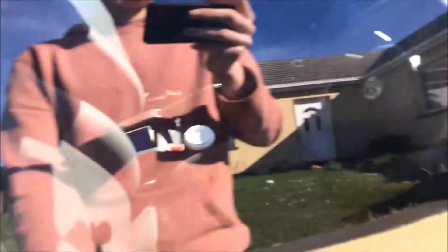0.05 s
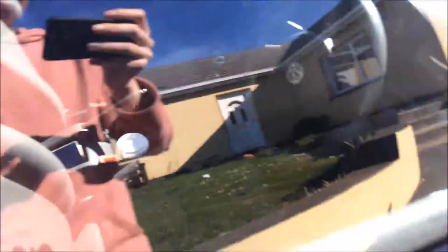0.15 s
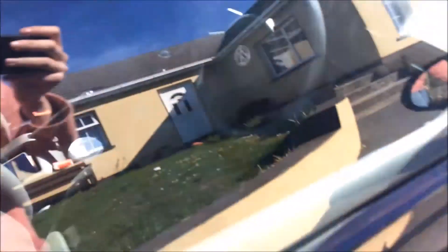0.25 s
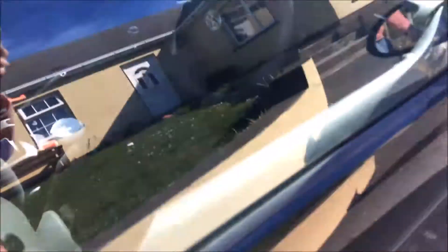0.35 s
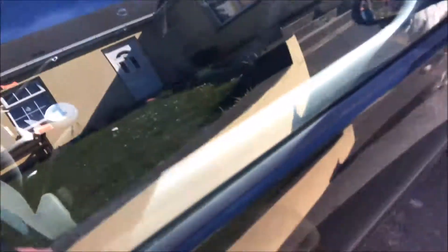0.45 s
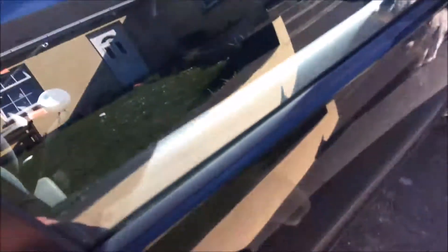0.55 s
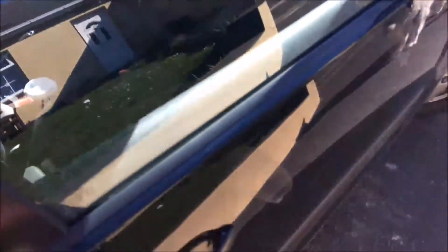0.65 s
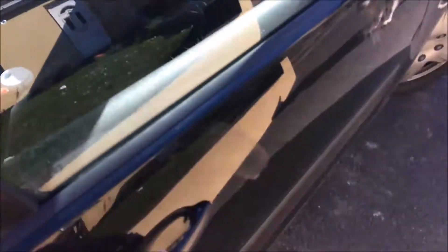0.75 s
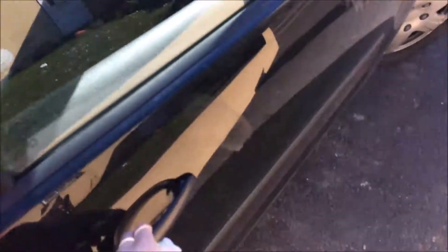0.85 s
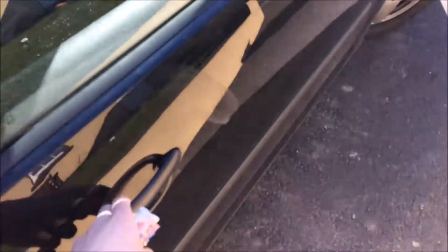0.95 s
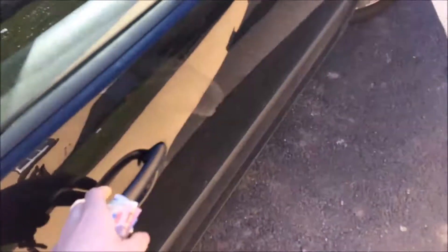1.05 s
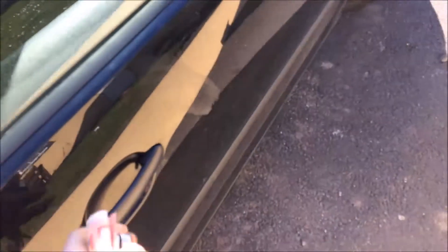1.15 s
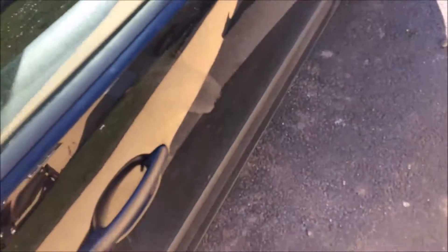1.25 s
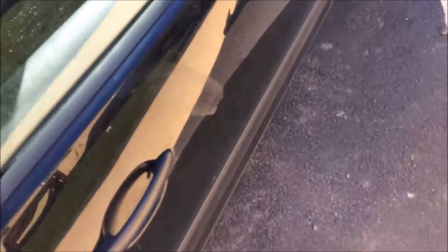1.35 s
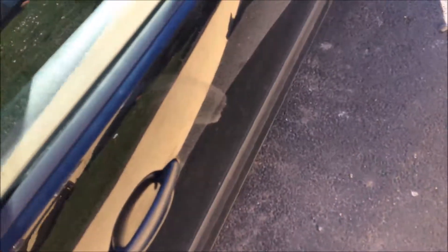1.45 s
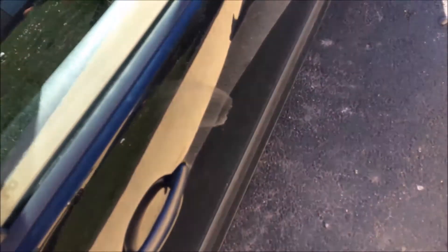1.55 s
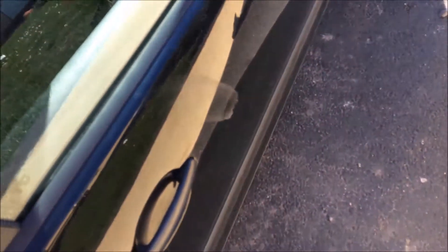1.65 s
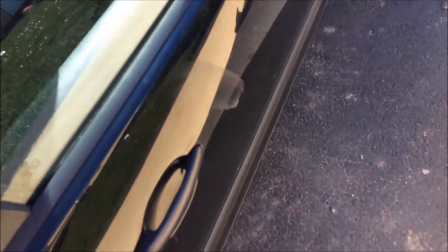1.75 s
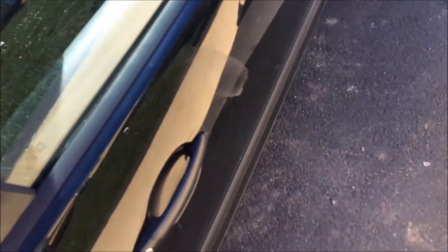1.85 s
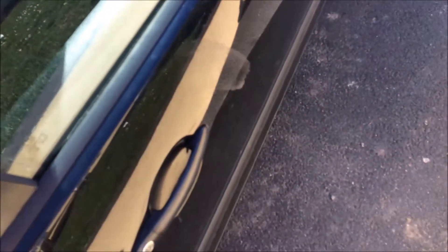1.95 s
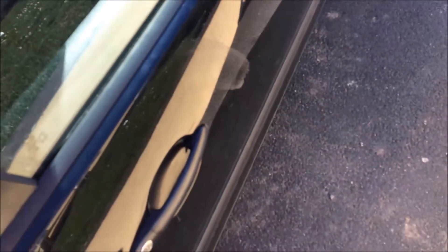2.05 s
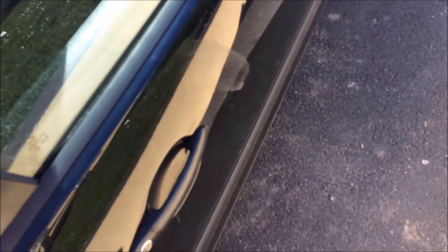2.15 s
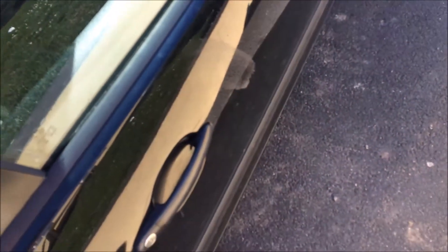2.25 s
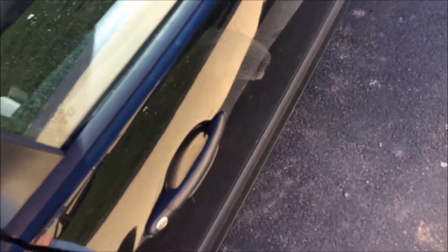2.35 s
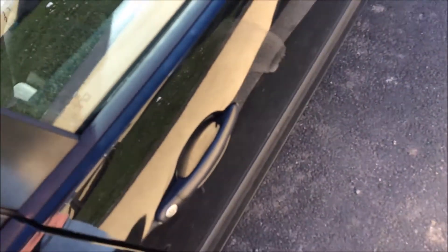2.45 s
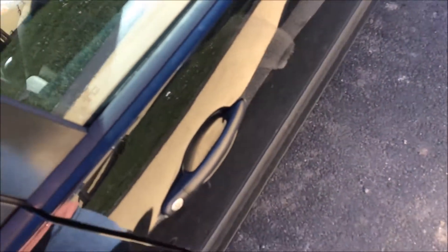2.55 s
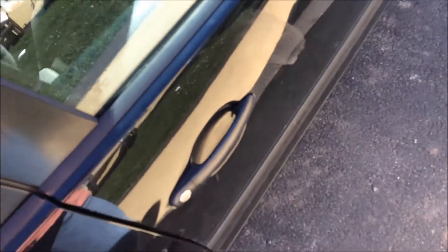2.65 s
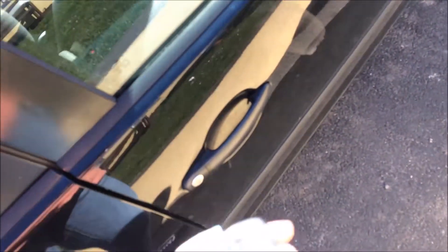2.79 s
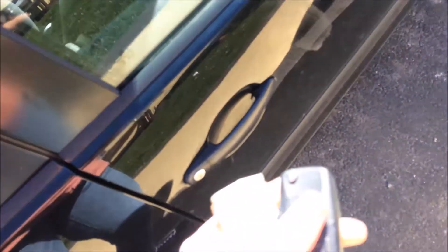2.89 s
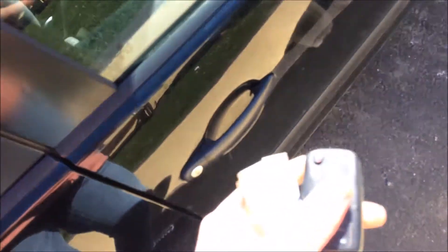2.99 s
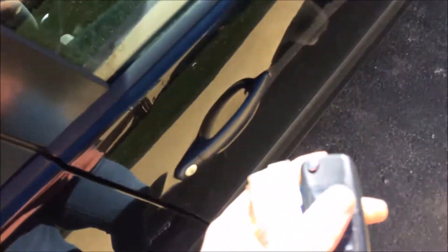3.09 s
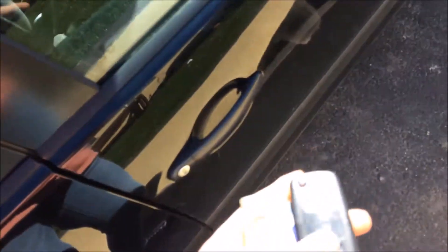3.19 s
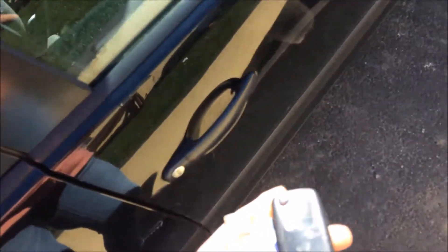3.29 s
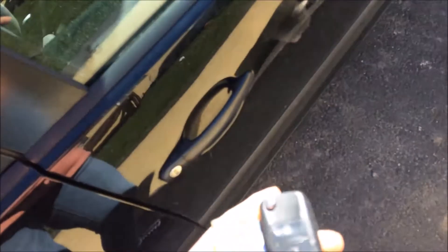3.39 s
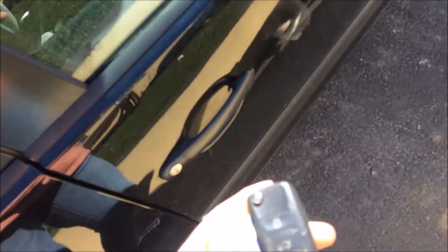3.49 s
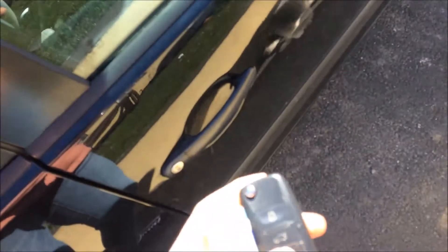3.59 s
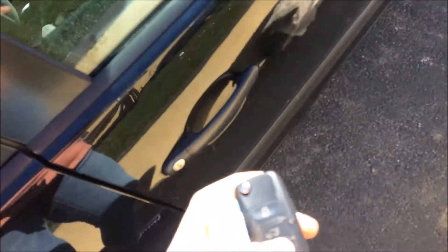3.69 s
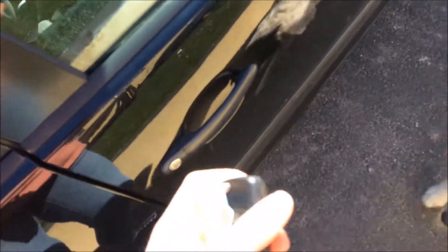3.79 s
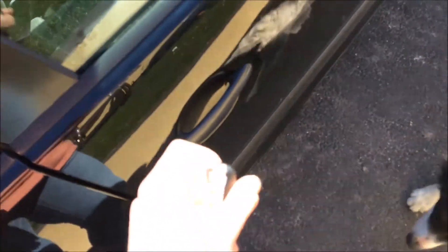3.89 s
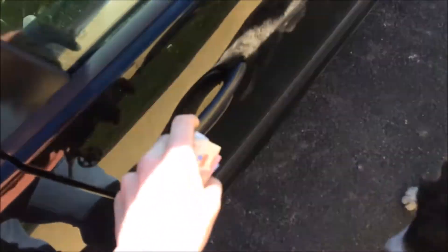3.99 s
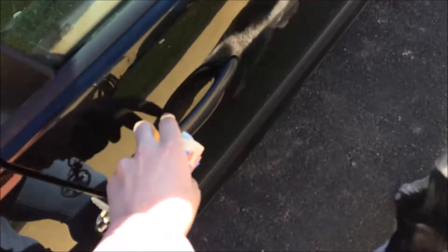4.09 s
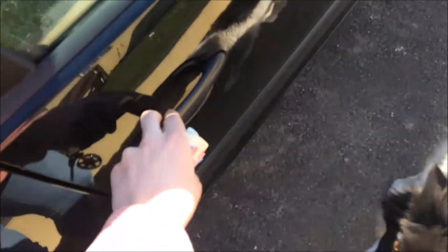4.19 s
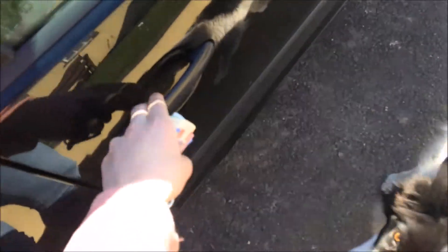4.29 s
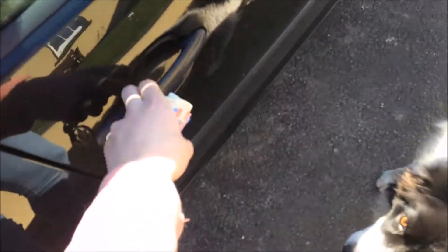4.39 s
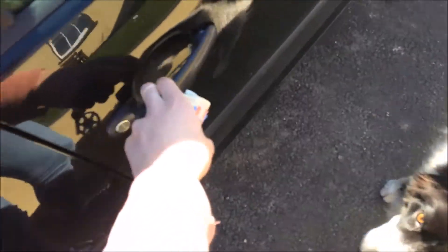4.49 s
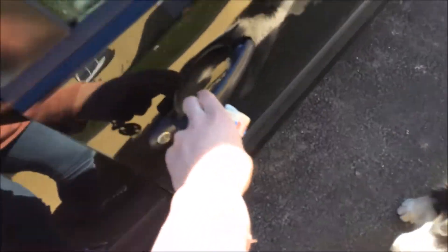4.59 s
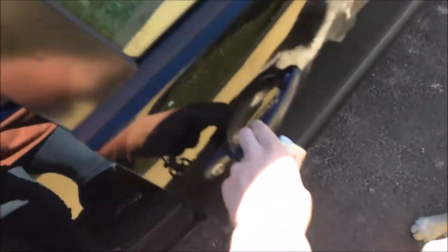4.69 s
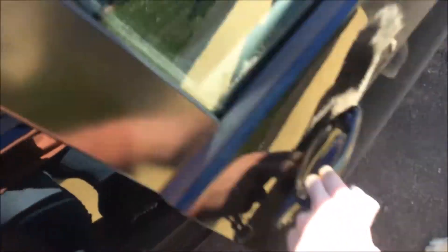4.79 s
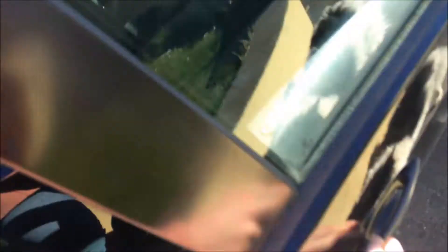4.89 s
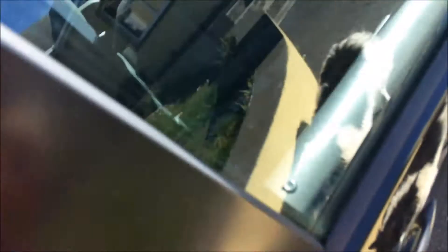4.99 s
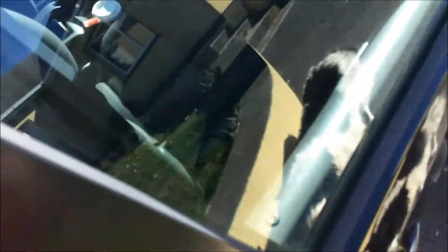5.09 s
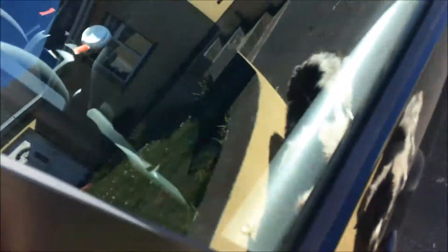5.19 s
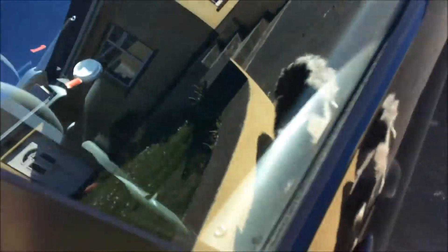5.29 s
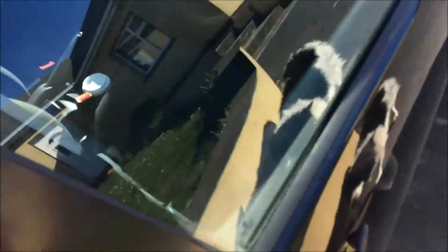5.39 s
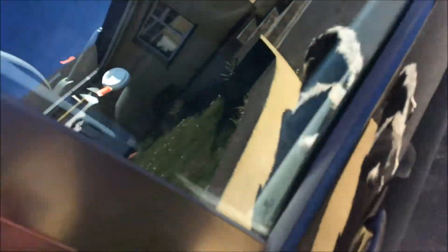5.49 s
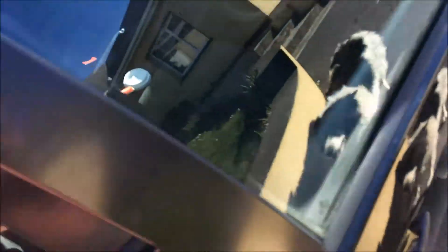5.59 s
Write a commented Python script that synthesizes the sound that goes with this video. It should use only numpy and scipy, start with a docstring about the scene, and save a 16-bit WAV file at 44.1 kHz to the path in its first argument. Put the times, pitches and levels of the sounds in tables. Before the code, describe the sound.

A dry, close mono phone pickup outdoors, about five and a half seconds. At the very start fingers tap dully on the phone, wind bumps low, and a faint bird whistle trembles as it falls. A car door handle snaps sharply at 0.3 s, with a fuller hollow clack at 1.05 s. Keys clink lightly, then jingle brightly from 1.6 to 3.3 s in uneven clusters, with tiny scrapes and thin high ringing, strongest near 2.1 and 3.2 s. A fob button gives small dry plastic snaps at 3.55 and 3.75 s. From 3.9 s the hand rubs and knocks the handle while gusts thump; a solid low clunk lands at 4.55 s. The loudest crack, with panel thud, comes at 5.0 s, and another sharp, lighter snap at 5.3 s. Keys keep jingling to the end over faint steady air.

```python
"""Keys and a car door outdoors

A phone is held in one hand while the other tries a door handle, fumbles with keys and presses a fob;
the locks clunk and the door unlatches. Keys, fob and door are decaying tones with short noise bursts,
dragging and rubbing are tiny noisy contacts, wind is low noise with slow swings as gusts bump the
microphone, and a bird gives one trembling whistle over faint air noise.
"""
import sys
import numpy as np
from scipy import signal
from scipy.fft import rfft, irfft
from scipy.io import wavfile
from scipy.ndimage import uniform_filter1d

SR = 44100
rng = np.random.default_rng(int(sys.argv[2]) if len(sys.argv) > 2 else 0)


def inscribe(sig):
    """Save sig as 16-bit PCM at rate SR to the path in sys.argv[1].

    A 1-D sig is mono; a 2-D sig holds one channel per row.
    Samples are clipped to [-1, 1] before scaling.
    """
    pcm = np.round(np.clip(np.atleast_2d(sig).T, -1, 1) * 32767)
    wavfile.write(sys.argv[1], SR, pcm.astype(np.int16))


N = 248724

# Tones of the four pieces of the bunch, a to d; in each: f/Hz, relative level/dB, free t60/s
KEY_MODES = [
    [(11030, 0, .2), (11065, -9, .12), (9700, -25, .15), (11200, -16, .08)],
    [(12755, 0, .16), (12790, -4, .14), (13900, -9, .05), (12400, -16, .06)],
    [(7890, 0, .17), (7950, -6, .1), (2400, -16, .1)],
    [(6505, 0, .16), (7100, -3, .09), (10600, -9, .06), (5930, -12, .08)],
]
# The moving hand: t/s, key rattle level/dB, level of rubbing on the door/dB
HAND_MOTION = [(0.0, -64, -57), (0.45, -72.5, -72.5), (0.66, -57.5, -54), (0.8, -73, -73.5),
               (1.0, -76.5, -63.5), (1.12, -63, -53), (1.22, -67.5, -84), (1.56, -61, -81),
               (1.8, -62.5, -88), (2.14, -63.5, -82), (2.23, -72.5, -61), (2.32, -72.5, -95),
               (2.62, -63, -78), (2.82, -74.5, -83), (3.0, -62.5, -66.5), (3.13, -68.5, -82),
               (3.24, -59.5, -74.5), (3.5, -71, -70.5), (3.82, -66, -74), (3.91, -50, -39.5),
               (4.05, -73, -43.5), (4.17, -72, -74), (4.42, -64, -67.5), (4.62, -55, -36),
               (4.74, -70.5, -92), (5.0, -70, -44.5), (5.2, -66, -73), (5.4, -54.5, -62),
               (5.64, -58.5, -79)]


def undb(db):
    """Turn decibels into a plain factor."""
    return 10 ** (np.asarray(db) / 20)


def unit(x):
    """Scale to rms 1."""
    return x / np.sqrt(np.mean(x ** 2))


def band(x, lo_hz, hi_hz):
    """Keep the band between two frequencies (Butterworth filter)."""
    sos = signal.butter(2, [lo_hz, min(hi_hz, .45 * SR)], "bandpass", fs=SR, output="sos")
    return signal.sosfilt(sos, x)


def curves(table):
    """Join the points of each table column by straight lines, one value a sample."""
    s, *columns = np.transpose(table)
    return [np.interp(np.arange(N) / SR, s, c) for c in columns]


def add(out, s, x):
    """Mix x into out from time s."""
    i = int(s * SR)
    out[i:i + len(x)] += x[:N - i]


def fade(t, t60):
    """Exponential decay that falls 60 dB in t60 seconds."""
    return np.exp(-np.log(1000) * t / max(t60, 1e-3))


def ring(modes, t, share, scatter_db, detune, near_hz=None, focus_db=0):
    """One blow sounds a set of decaying tones; share scales their ring time, near_hz favours a pitch."""
    hz, db, t60 = np.transpose(modes)[:, :, None]
    gain, bend, phase = rng.standard_normal((3, len(modes), 1))
    if near_hz:
        # focus_db is lost for each octave away from the favoured pitch
        db = db - focus_db * np.abs(np.log2(hz / near_hz))
    swing = np.sin(2 * np.pi * hz * (1 + detune * bend) * t + phase / 2)
    decay = np.exp(-np.log(1000) * t / (t60 * max(share, .05)))
    return np.sum(undb(db + scatter_db * gain) * swing * decay, axis=0)


def burst(t, lo_hz, hi_hz, t60):
    """A decaying puff of noise."""
    return unit(band(rng.standard_normal(len(t)), lo_hz, hi_hz)) * fade(t, t60)


def grains(rate, spread_db, t60, size=N):
    """Noise broken into tiny uneven contacts, on average rate of them a second."""
    strength = undb(spread_db * np.minimum(rng.exponential(size=size), 3.2))
    hits = (rng.random(size) < rate / SR) * strength + 1e-9
    tail = signal.lfilter([1], [1, -fade(1 / SR, t60)], hits)
    return unit(tail * rng.standard_normal(size))


def colour(x, spectrum):
    """Shape by (f/Hz, level/dB) points, falling 24 dB per octave outside them."""
    hz, db = np.transpose(spectrum)
    f = np.fft.rfftfreq(N, 1 / SR) + 1
    octaves_outside = np.maximum(np.log2(hz[0] / f), 0) + np.maximum(np.log2(f / hz[-1]), 0)
    gain_db = np.interp(np.log(f), np.log(hz), db) - 24 * octaves_outside
    return unit(irfft(rfft(x) * undb(gain_db), N))


def keys():
    """Each clink is a click plus the ring of the pieces it touches; the moving bunch also rattles finely."""
    # Keys striking each other: t/s, relative bright click level/dB, relative dull click level/dB,
    # dull pitch f/Hz, base t60 of the click, its bright and dull noise and its dull tones/s,
    # relative ring level/dB, pieces struck directly
    clinks = [(0.0817, -46, -64, 3000, 0.015, -53.5, "a"), (0.1, -38.5, -73, 2920, 0.03, -49.5, "b"),
              (0.228, -54, -63, 1370, 0.03, -64, "d"), (0.342, -56, -58, 3400, 0.076, -68, "bc"),
              (0.3637, -42, -49, 2070, 0.046, -53.5, "bc"), (0.4058, -47, -53, 1343, 0.14, -53.5, "bcd"),
              (0.4404, -41, -45, 1700, 0.057, -50.5, "ac"), (0.452, -34, -62, 1740, 0.063, -54, "c"),
              (0.551, -42, -51.5, 4400, 0.023, -52, "b"), (0.5968, -53, -52, 2360, 0.03, -42, "c"),
              (0.6533, -28.5, -43.5, 1577, 0.1, -48, "c"), (0.946, -63, -51.5, 1280, 0.013, -86, "a"),
              (0.9793, -42, -52, 1430, 0.012, -71, "a"), (1.1005, -54, -64, 1400, 0.024, -48, "b"),
              (1.2213, -37, -55.5, 2410, 0.13, -50, "bcd"), (1.358, -57, -56, 3200, 0.025, -65, "abc"),
              (1.588, -33, -52, 1410, 0.022, -73, "bc"), (1.6152, -34, -67, 5800, 0.051, -48.5, "abc"),
              (1.688, -54, -50, 3730, 0.024, -71, "ac"), (1.7003, -52, -54, 2400, 0.077, -52, "ab"),
              (1.7215, -47, -66, 5300, 0.057, -51, "abc"), (1.8853, -38, -53, 1910, 0.043, -58, "bc"),
              (1.93, -21.5, -47, 2040, 0.02, -68, "bd"), (1.964, -16.5, -45, 1970, 0.029, -52, "abd"),
              (2.0208, -43, -41.5, 1930, 0.0074, -63, "ac"), (2.0672, -50, -49, 2190, 0.042, -53, "a"),
              (2.0854, -18.5, -42, 1750, 0.02, -50, "ad"), (2.12, -34, -48.5, 3670, 0.067, -44.5, "a"),
              (2.1602, -24, -38.5, 5140, 0.047, -34.5, "b"), (2.4124, -36, -78, 1680, 0.013, -64, "a"),
              (2.453, -25, -38, 4700, 0.0055, -49, "a"), (2.495, -49, -49, 1860, 0.021, -79, "c"),
              (2.5193, -49, -39.5, 2050, 0.023, -59, "ad"), (2.5681, -42, -48, 3730, 0.0075, -54.5, "b"),
              (2.593, -32, -42, 3850, 0.018, -68, "b"), (2.6055, -38, -46.5, 3780, 0.1, -39.5, "b"),
              (2.7511, -37.5, -54, 2340, 0.073, -47, "c"), (2.7726, -37, -52, 2300, 0.03, -51, "bd"),
              (2.802, -53, -45.5, 2440, 0.017, -53, "c"), (2.9128, -30, -54, 1814, 0.27, -40.5, "bc"),
              (2.9398, -21, -31, 3740, 0.015, -48, "c"), (2.962, -24, -55, 4900, 0.074, -46, "bc"),
              (2.9816, -17, -48, 5070, 0.043, -33.5, "bc"), (3.0565, -47, -54, 5730, 0.021, -63, "ab"),
              (3.0714, -21.5, -71, 5300, 0.038, -43.5, "a"), (3.1815, -27, -55, 5330, 0.071, -46, "ab"),
              (3.2023, -22.5, -51.5, 4840, 0.13, -24.5, "a"), (3.324, -37, -55, 4760, 0.05, -61, "b"),
              (3.4318, -35, -81, 4860, 0.03, -55.5, "bcd"), (3.7138, -31, -48, 5830, 0.034, -82, "bd"),
              (3.8387, -46, -52, 1890, 0.19, -48, "b"), (3.8677, -24, -37, 2340, 0.02, -45, "bc"),
              (3.958, -48, -39.5, 2100, 0.09, -47.5, "a"), (4.0666, -40, -42, 2304, 0.063, -38, "ab"),
              (4.093, -27, -46, 2300, 0.03, -50, "ab"), (4.1895, -25, -37, 1180, 0.027, -62, "bd"),
              (4.219, -48, -35.5, 1770, 0.0097, -62, "cd"), (4.238, -35, -50, 2500, 0.049, -58, "c"),
              (4.2657, -27, -49, 3050, 0.029, -51, "a"), (4.343, -34, -52, 4960, 0.034, -47, "abc"),
              (4.3846, -37, -57.5, 2400, 0.13, -43.5, "abcd"), (4.4698, -49, -61, 1300, 0.03, -48, "abcd"),
              (4.6155, -39, -32, 1490, 0.01, -48.5, "ab"), (4.8447, -41, -55, 1290, 0.042, -83, "d"),
              (4.886, -25.5, -50.5, 3540, 0.065, -48, "d"), (4.9324, -29.5, -51, 1270, 0.021, -61, "b"),
              (5.0496, -34, -50, 1384, 0.13, -49, "ac"), (5.133, -42, -52.5, 1655, 0.062, -62, "ac"),
              (5.167, -33, -51.5, 5250, 0.032, -60, "bc"), (5.23, -23, -46.5, 5450, 0.031, -47, "d"),
              (5.2544, -38, -67, 4860, 0.017, -45, "acd"), (5.295, -47, -34.5, 2980, 0.13, -38, "c"),
              (5.3877, -26, -41.5, 2910, 0.044, -56, "bc"), (5.4345, -28, -42.5, 3220, 0.024, -42.5, "b"),
              (5.469, -27, -61, 4700, 0.038, -44.5, "ac"), (5.526, -29, -46, 4800, 0.028, -51, "cd"),
              (5.5492, -22.5, -71, 4980, 0.13, -46, "cd"), (5.6136, -55.5, -48.5, 3130, 0.031, -68, "d")]
    # Level under the ring of pieces that are only shaken, one for each piece: level/dB
    shaken_levels = [-14.5, -7.5, -11, -14.5]
    # Spectrum of the fine rattle: f/Hz, relative level/dB
    rattle_spectrum = [(1500, 1.5), (2200, 0), (3200, 0), (4600, -3), (6500, -3), (9000, -6), (12500, -9)]
    shaken_spread_db, key_ring_share = 2, 0.71  # fingers shorten every ring
    out, t = np.zeros(N), np.arange(16000) / SR
    short = t[:4096]
    times = np.array([row[0] for row in clinks])
    rise = 1 - np.exp(-t / 0.00011)
    short_rise = rise[:4096]
    for s, bright_db, dull_db, dull_hz, t60, ring_db, struck in clinks:
        # small links and rings give each click a brief pitch of its own
        overtones = [(dull_hz, 0, t60), (1.47 * dull_hz, -5, t60), (2.3 * dull_hz, -7, t60)]
        links = ring(overtones, short, 1.4, 1.9, 0.0295)
        dull = undb(-2) * burst(short, 930, 5300, t60) + undb(-3) * links
        bright = undb(bright_db - 17.5) * burst(short, 4400, 12000, t60)
        add(out, s, short_rise * (bright + undb(dull_db) * dull))
        # a few short chance tones from wherever the pieces meet
        stray = [(5200. * 2 ** (1.45 * u), 0, .06) for u in rng.random(4)]
        add(out, s, short_rise * undb(ring_db - 13) * ring(stray, short, 1, 4.1, 0))
        # every later clink takes a little of the ring away
        touches = np.searchsorted(times, s + t) - np.searchsorted(times, s + 1e-4)
        left = undb(-3.5 * uniform_filter1d(np.maximum(touches, 0.), size=128))
        shaken_db = np.array(shaken_levels) + shaken_spread_db * rng.standard_normal(len(KEY_MODES))
        piece_db = [ring_db + (0 if name in struck else db) for name, db in zip("abcd", shaken_db)]
        pieces = sum(undb(db) * ring(key, t, key_ring_share, 1.0, 0.002)
                     for key, db in zip(KEY_MODES, piece_db))
        add(out, s, rise * left * pieces)
    # faint random touches, about 25 a second on each piece, keep the bunch singing
    taps = (rng.random((len(KEY_MODES), N)) < 25 / SR) * rng.standard_normal((len(KEY_MODES), N))
    jingle = sum(signal.fftconvolve(tap, ring(key, t[:6000], 0.17, 0.9, 0.0016))[:N]
                 for tap, key in zip(taps, KEY_MODES))
    rattle = colour(grains(1500, 0.9, 0.011), rattle_spectrum)
    return out + undb(curves(HAND_MOTION)[0]) * (rattle + undb(-12.0) * unit(jingle))


def tag():
    """A freely hanging piece sings clearly until the next touch stops it and sets it off afresh."""
    # The piece's one tone: f/Hz, relative level/dB, free t60/s
    tag_modes = [(4851, 0, .7)]
    # Touches that set it off: t/s, level/dB, share of the free ring time
    tag_hits = [(0.5966, -57.5, 0.89), (.6533, -58.5, 1), (.748, -72, 0.37), (1.2207, -66, 0.66),
                (1.6152, -59, 0.96), (1.7215, -55, 0.52), (2.1603, -58, .5), (2.4523, -57, 0.71),
                (2.6055, -63.5, 0.99), (2.9108, -54.5, 1), (3.2021, -44, 0.78), (3.8387, -66, .8),
                (4.2661, -66, .4), (4.343, -60, 0.55), (4.6166, -66, .8), (5.254, -66, .7),
                (5.435, -53.5, 1), (5.5263, -49.5, 0.62)]
    out, t = np.zeros(N), np.arange(SR // 2) / SR
    ends = [row[0] for row in tag_hits[1:]] + [N / SR]
    rise = np.clip(t / 0.0043, 0, 1)
    for (s, db, share), end in zip(tag_hits, ends):
        stop = np.clip((end - s - t) / .004 + 1, 0, 1)
        add(out, s, undb(db) * ring(tag_modes, t, share, .5, 0.0006) * stop * rise)
    return out


def scrapes():
    """Keys and fingers drag in uneven runs of small contacts that start fast and die away; the keys ring."""
    # Runs: t/s, length/s, then relative bright, middle and low levels/dB
    runs = [(0.058, 0.26, -72, -91, -83), (0.363, .14, -61, -62, -47), (0.636, 0.061, -51.5, -58, -46.5),
            (1.038, 0.038, -56, -56, -47), (1.61, 0.0077, -41.5, -49.5, -72), (2.071, 0.032, -54, -51, -98),
            (2.134, 0.064, -47, -47.5, -70), (2.6, 0.037, -45.5, -48, -64), (2.756, 0.066, -59, -60, -83),
            (2.901, 0.07, -50, -47.5, -62), (3.812, 0.08, -61, -54.5, -92), (3.856, 0.25, -52, -50, -71),
            (4.196, 0.085, -59, -56, -52.5), (4.469, 0.051, -70, -55.5, -45.5),
            (4.567, 0.16, -83, -75, -54), (4.878, 0.017, -77, -55, -65), (4.968, 0.062, -54.5, -55, -52.5),
            (5.133, 0.072, -56, -59, -65), (5.217, 0.065, -47, -87, -71), (5.379, 0.16, -60, -69, -73),
            (5.53, 0.039, -47.5, -80, -84)]
    key_ring_db = -8.5  # under the bright chatter
    out, ring_t = np.zeros(N), np.arange(4096) / SR
    for s, length, bright_db, middle_db, low_db in runs:
        t = np.arange(int((length + .05) * SR)) / SR
        start = np.clip(t / 0.0094, 0, 1)
        shape = start * undb(-3 * t / length) * np.exp(-np.maximum(t - length, 0) / 0.0053)
        metal, skin = (grains(380, 3.7, 0.013, size=SR // 3)[:len(t)] for _ in range(2))
        layers = ((bright_db, metal, 4500, 15500),
                  (middle_db, metal + 1.1 * skin, 1300, 4500),
                  (low_db, skin + 0.32 * metal, 300, 1300))
        chatter = sum(undb(db) * unit(band(x, lo_hz, hi_hz)) for db, x, lo_hz, hi_hz in layers)
        add(out, s, shape * chatter)
        bunch = sum(undb(7.6 * rng.standard_normal()) * ring(key, ring_t, 0.3, 3.9, 0.0012)
                    for key in KEY_MODES)
        singing = unit(signal.fftconvolve(shape * metal, bunch))
        # a short run gives its ring less strength
        strength = np.sqrt(len(t) / (len(t) + len(ring_t)))
        add(out, s, undb(bright_db + key_ring_db) * singing * strength)
    return out


def fob():
    """The button dome snaps in a plastic shell: short tones and two puffs of noise."""
    # Snaps: t/s, relative level/dB
    snaps = [(3.5586, -23.5), (3.759, -24)]
    # Tones of dome and shell: f/Hz, relative level/dB, free t60/s
    shell_modes = [(1800, -32, .004), (2460, 12, 0.0026), (3640, 8.5, 0.0042), (5360, -1, 0.0068),
                   (9800, -14, 0.0014)]
    out, t = np.zeros(N), np.arange(1024) / SR
    for s, db in snaps:
        snap = ring(shell_modes, t, 0.95, 0.8, 0.01)
        snap = snap + undb(1.5) * burst(t, 1500, 12000, 0.0037)
        snap = snap + undb(-7.5) * burst(t, 830, 6600, 0.04)
        add(out, s, undb(db - 13.5) * band(snap, 1600, 12400))
    return out


def door():
    """Blows crack, ring the panel and leave a short noisy tail; the hand rubs on the door."""
    # Handle, lock and latch blows: t/s, relative crack, snap, knock and thud levels/dB,
    # favoured snap, knock and thud f/Hz, share of the free ring time, contact build-up time/s
    blows = [(0.2849, -12.5, -37.5, -45.5, -27.5, 1980, 940, 124, 0.47, 0.00034),
             (0.3023, -38, -57, -52, -35.5, 1650, 610, 175, 0.7, 0.0024),
             (0.3802, -44, -42.5, -58, -67, 2040, 480, 139, 0.43, 0.00068),
             (0.3947, -34, -46, -37, -36, 2440, 420, 151, 1, 0.0025),
             (0.4775, -45, -47, -35, -32.5, 1760, 465, 115, 0.6, 0.00041),
             (0.6619, -23, -32, -33, -40.5, 1530, 450, 420, 0.71, 0.0053),
             (0.9802, -65, -61, -54, -40, 2720, 543, 123, 1, 0.0015),
             (1.0579, -18.5, -28, -24.5, -18.5, 2140, 668, 127, 0.55, 0.0023),
             (3.8695, -45, -31.5, -31, -29.5, 2300, 1000, 350, 0.69, 0.0017),
             (3.9211, -30, -39, -32.5, -32, 2280, 550, 249, 0.8, 0.0024),
             (3.9812, -28, -33, -35.5, -26.5, 1960, 1020, 139, 0.88, 0.0016),
             (4.031, -20.5, -24.5, -33.5, -29, 1710, 796, 146, 0.58, 0.0033),
             (4.2243, -50, -48, -38, -30.5, 2370, 563, 110, 0.5, 0.00096),
             (4.4486, -41, -62, -29.5, -58, 1500, 1120, 447, 0.45, 0.0011),
             (4.5199, -31, -64, -40.5, -28.5, 1610, 1330, 240, 0.56, 0.0014),
             (4.5647, -21, -22.5, -19.5, -14.5, 1540, 553, 234, 0.45, 0.0022),
             (4.592, -29.5, -28.5, -20, -34, 1640, 478, 181, 0.76, 0.0011),
             (4.6194, -52, -41, -49, -46, 1520, 452, 124, 0.91, 0.0013),
             (4.6531, -37, -39, -48, -27.5, 1570, 560, 114, 0.35, 0.0012),
             (4.6821, -59, -46, -41, -35.5, 1900, 865, 243, 0.75, 0.0011),
             (4.9908, -3, -17.5, -14.5, -11, 2270, 905, 127, 0.55, 0.00081),
             (5.0272, -35, -42.5, -32.5, -30.5, 1620, 470, 222, 0.57, 0.00061),
             (5.306, -5, -17.5, -21, -24, 2730, 660, 307, 0.57, 0.0007),
             (5.3286, -21, -36.5, -30, -37, 3700, 454, 237, 0.64, 0.00086)]
    # Door panel tones, low, middle and high; in each: f/Hz, relative level/dB, free t60/s
    thud_modes = [(112, -23, 0.07), (131.7, 3, 0.19), (180.7, -3.5, 0.39), (239, 4.5, 0.16),
                  (277.3, 0, 0.29), (323.8, -3, 0.26), (384, 4.5, 0.098)]
    knock_modes = [(400, 5.5, 0.19), (544, -37, 0.34), (573, -3.5, 0.27), (607, -19, 0.27),
                   (736, 14, 0.094), (850, -14, 0.024), (918, 10.5, 0.047), (1110, 17.5, 0.021),
                   (1310, -51, 0.094)]
    snap_modes = [(1690, -19, 0.17), (1837, 12, 0.049), (2228, -5.5, 0.087), (2600, 18, 0.023),
                  (3210, 12.5, 0.036), (3100, -24, 0.025), (4430, -42, 0.1)]
    # Thin metal parts that sing on after a blow: t/s, f/Hz, level/dB, t60/s
    singing_parts = [(1.062, 634, -57, 1), (1.063, 1080, -60.5, 0.77), (4.759, 1254, -65, 0.96)]
    # Spectrum of the rubbing: f/Hz, relative level/dB
    rub_spectrum = [(250, 1), (400, -3.5), (650, -5.5), (1000, -9), (1500, -12)]
    boom_db, boom_t60_s = -9, 0.24  # the whole door booms under the thud
    out, t = np.zeros(N), np.arange(12000) / SR
    for s, crack_db, snap_db, knock_db, thud_db, snap_hz, knock_hz, thud_hz, share, contact in blows:
        # a softer contact builds up more slowly
        rise = 1 - np.exp(-t / max(contact, 1e-4))
        crack = burst(t, 2500, 15000, .007)
        crack = crack + undb(-0.5) * burst(t, 4700, 8000, 0.049 * share)
        snap = ring(snap_modes, t, share, 0.72, 0.039, snap_hz, focus_db=17.5)
        snap = snap + undb(3.0) * burst(t, 0.72 * snap_hz, 1.72 * snap_hz, 0.12 * share)
        knock = ring(knock_modes, t, share, 1.1, 0.021, knock_hz, focus_db=37.5)
        knock = knock + undb(3.4) * burst(t, 0.47 * knock_hz, 1.32 * knock_hz, 0.12 * share)
        thud = ring(thud_modes, t, share, 1.7, 0.0359, thud_hz, focus_db=11)
        thud = thud + undb(boom_db) * burst(t, 61, 246, boom_t60_s)
        # the heavy panel takes a few ms to get going
        thud = thud * (1 - np.exp(-t / 0.0075))
        add(out, s, undb(crack_db - 15) * crack * np.sqrt(rise))
        add(out, s, rise * (undb(snap_db - 8.0) * snap + undb(knock_db - 3.5) * knock))
        add(out, s, undb(thud_db) * thud)
    t = np.arange(SR // 2) / SR
    for s, hz, db, t60 in singing_parts:
        add(out, s, undb(db) * np.sin(2 * np.pi * hz * t) * fade(t, t60))
    return out + undb(curves(HAND_MOTION)[1]) * colour(grains(500, 7.6, 0.011), rub_spectrum)


def grip():
    """Fingers shift on the phone: dull taps through the case, each a few quickly fading swings."""
    # Taps: t/s, relative level/dB, f/Hz
    finger_taps = [(.037, -46, 436), (.088, -46, 570), (0.098, -42, 360), (.128, -53, 400), (.17, -65, 420),
                   (.57, -62, 380), (3.355, -62, 290), (.245, -63, 456), (4.326, -41.5, 480),
                   (4.333, -39.5, 364), (4.245, -58, 416)]
    out, t = np.zeros(N), np.arange(1024) / SR
    for s, db, hz in finger_taps:
        add(out, s, undb(db) * np.sin(2 * np.pi * hz * t) * (t / 0.00091) * np.exp(1 - t / 0.0019))
    return out


def eddies(lo_hz, hi_hz, even_s):
    """Low noise whose strength is evened out, so that the wind levels shape it."""
    x = band(band(rng.standard_normal(N), lo_hz, hi_hz), lo_hz, hi_hz)
    return unit(x / np.sqrt(uniform_filter1d(x ** 2, int(even_s * SR)) + 1e-9))


def wind():
    """Eddies push the diaphragm; single gusts give short, fading swings and stir the eddies up."""
    # Wind apart from the single gusts: t/s, rumble level/dB, flutter level/dB
    wind_levels = [(0.0, -48, -45), (0.25, -50, -59), (0.33, -54, -45), (0.62, -57, -59),
                   (0.76, -43, -55.5), (0.83, -54.5, -72), (0.95, -64, -88), (1.2, -56.5, -67),
                   (1.5, -61.5, -79), (1.72, -85, -89), (1.9, -58, -69.5), (2.04, -74, -80),
                   (2.28, -53.5, -73), (2.36, -72, -76), (2.6, -68, -77), (3.25, -72, -82),
                   (3.56, -56, -60), (3.79, -63.5, -100), (4.05, -40.5, -42.5), (4.3, -41.5, -50),
                   (4.45, -54, -70), (4.6, -42, -30.5), (4.72, -54, -43), (4.85, -47, -55.5),
                   (5.02, -53, -31), (5.25, -56.5, -71), (5.64, -60, -60)]
    # Single gusts: t/s, relative swing level/dB, swing f/Hz, level of the stirred rumble/dB
    puffs = [(0.052, -31.5, 120, -63), (.09, -42, 122, -35.5), (0.199, -40, 60, -43.5),
             (0.498, -45, 59.6, -33.5), (.58, -40, 111, -41), (.7, -55, 60, -57), (0.861, -60, 59.5, -50.5),
             (1.332, -47.5, 154, -76), (1.59, -36.5, 103, -47.5), (1.885, -43.5, 119, -63),
             (2.111, -39, 62, -56), (2.21, -57, 58.4, -65), (2.697, -34.5, 59, -53),
             (2.859, -70, 55, -59.5), (2.988, -67, 55, -46.5), (3.341, -52, 51.1, -58),
             (3.41, -43, 111, -53.5), (3.473, -40.5, 80.2, -63), (3.534, -49, 74, -58),
             (3.568, -39, 88.8, -56), (3.594, -39, 127, -70), (3.83, -46, 70.0, -61), (4.099, -46, 70, -40),
             (4.151, -34, 111, -44), (4.269, -49, 80.6, -40.5), (4.328, -45, 151, -37),
             (4.639, -32, 70, -36), (4.49, -54, 110, -51), (4.778, -29, 112, -40.5), (5.472, -62, 110, -56),
             (5.561, -48, 70, -54.5)]
    stir_lag_s, stir_s = 0.004, 0.017  # eddies swell and sink around a point just after the gust starts
    flutter_db, flutter_db_per_octave = -5.5, 13  # quicker swings stir more flutter
    rumble, flutter = undb(curves(wind_levels))
    out, t, clock = np.zeros(N), np.arange(2048) / SR, np.arange(N) / SR
    for s, db, hz, stir_db in puffs:
        add(out, s, undb(db) * np.sin(2 * np.pi * hz * t) * (t / 0.0024) * np.exp(1 - t / 0.0028))
        stir = undb(stir_db) * np.exp(-np.abs(clock - s - stir_lag_s) / stir_s)
        rumble = rumble + stir
        flutter = flutter + stir * undb(flutter_db + flutter_db_per_octave * np.log2(hz / 133.0))
    out = out + rumble * eddies(47.7, 116.2, 0.051)
    out = out + flutter * eddies(97.6, 226, 0.044)
    return out + undb(-77) * eddies(22, 55, 0.12)  # a faint, constant deep rumble


def bird():
    """One whistle, a gliding pure tone that rises briefly and then falls, trembling 45 times a second."""
    # Pitch and loudness of the whistle: t/s, f/Hz, level before the trembling/dB
    whistle = [(.055, 3220, -81), (.07, 3450, -57.5), (.09, 2800, -60), (.14, 2720, -65), (.2, 2620, -93),
               (.22, 2600, -85)]
    hz, db = curves(whistle)
    t = np.arange(N) / SR
    waver = 1 + 0.43 * np.sin(2 * np.pi * 45 * t)
    sounding = (t > whistle[0][0]) * (t < whistle[-1][0])
    return undb(db) * waver * np.sin(2 * np.pi * np.cumsum(hz) / SR) * sounding


def open_air():
    """Quiet, steady noise of the open air."""
    # Spectrum of the air: f/Hz, relative level/dB
    air_spectrum = [(88, -1), (150, -5), (475, -4.5), (2360, -7), (4160, -32), (10800, -33), (11700, -38),
                    (12900, -17), (15100, -25), (16000, -57)]
    return undb(-72.5) * colour(rng.standard_normal(N), air_spectrum)


def scene():
    """All sources over quiet open air, in one channel."""
    handling = keys() + tag() + scrapes() + fob() + door() + grip()
    return (handling + wind() + bird() + open_air())[None]


def record(dry):
    """The hardest peaks are softly rounded, the microphone fades in the highest treble, the phone cuts it."""
    ceiling = 1.1  # the rounded peaks approach this
    dry = ceiling * np.tanh(dry / ceiling)
    dry = signal.sosfilt(signal.butter(8, 15100, fs=SR, output="sos"), dry)
    # steep cut above 16300 Hz: 0.2 dB ripple below it, 60 dB loss well above
    return signal.sosfilt(signal.ellip(8, .2, 60, 16300, fs=SR, output="sos"), dry)


dry = scene()
out = record(dry)
inscribe(out)
```